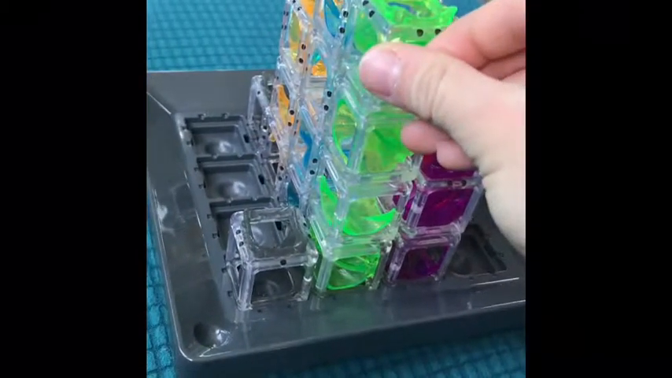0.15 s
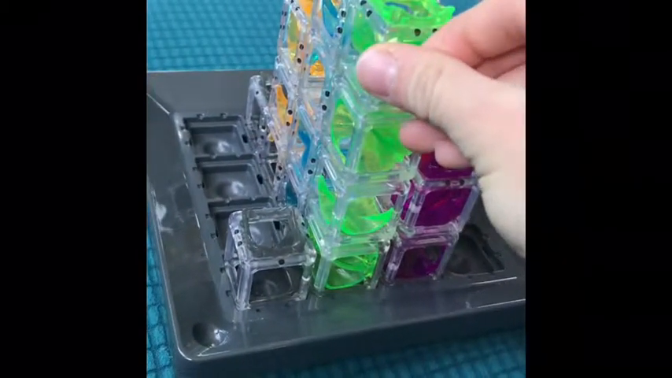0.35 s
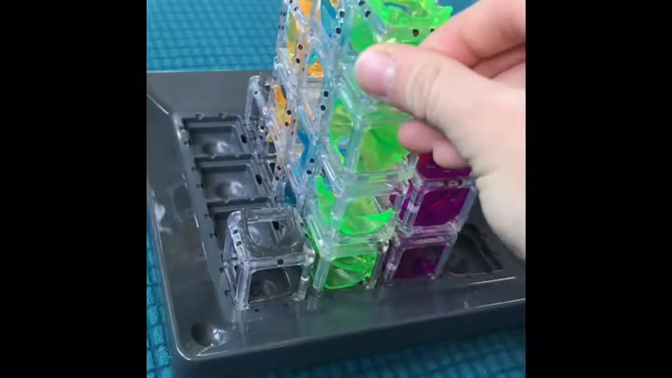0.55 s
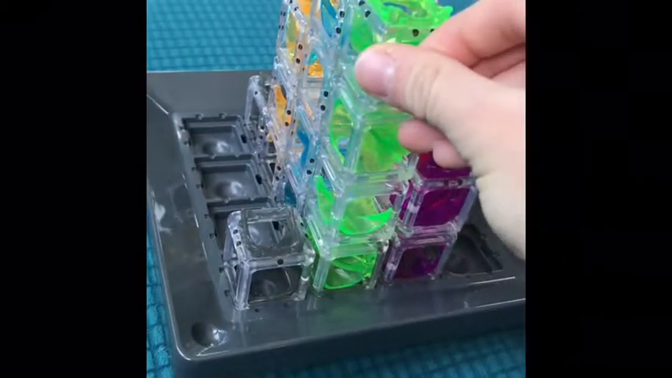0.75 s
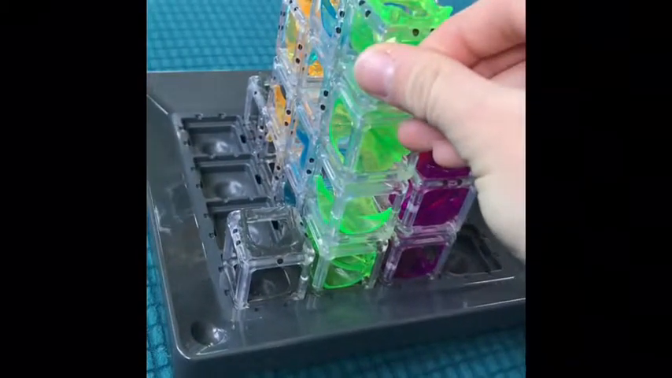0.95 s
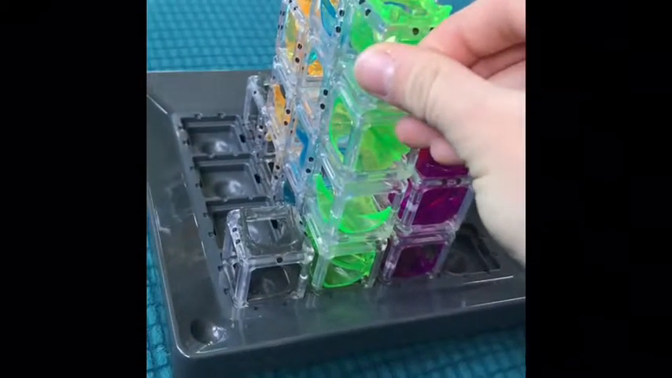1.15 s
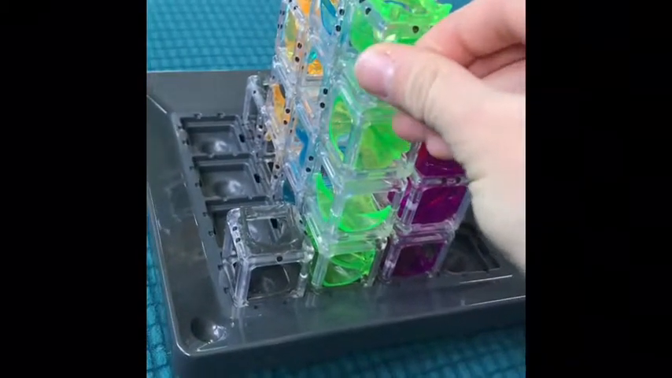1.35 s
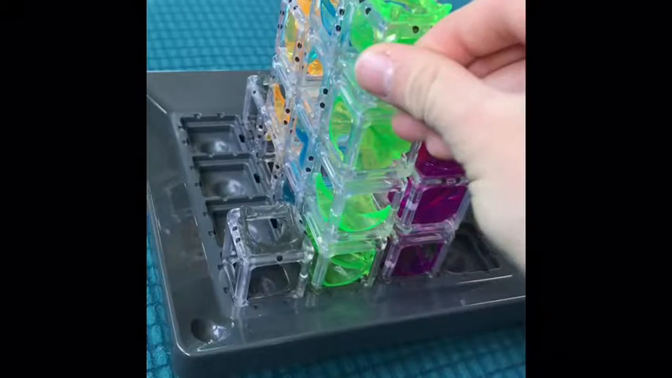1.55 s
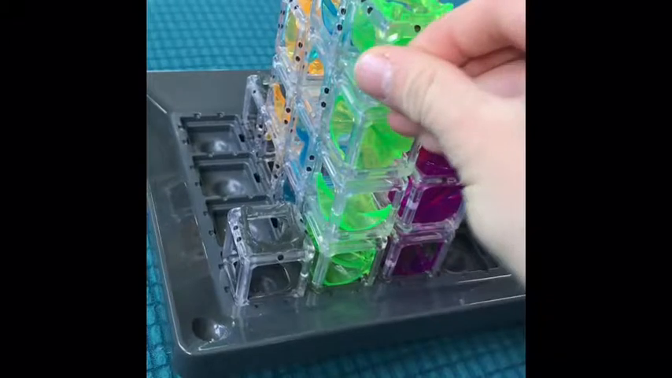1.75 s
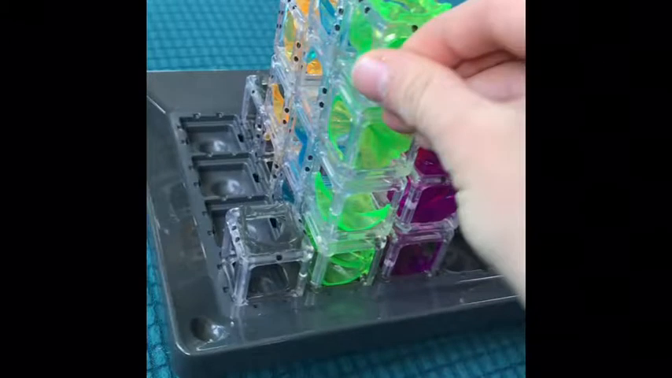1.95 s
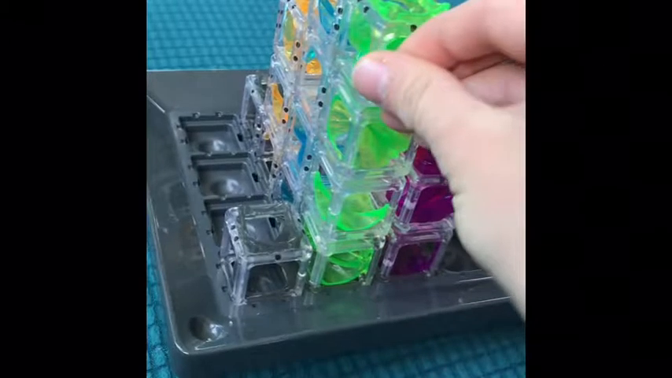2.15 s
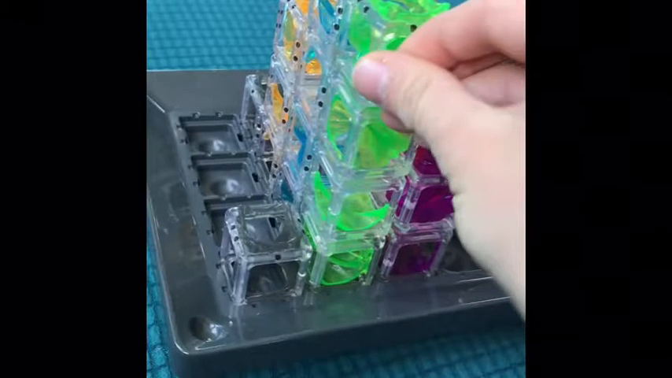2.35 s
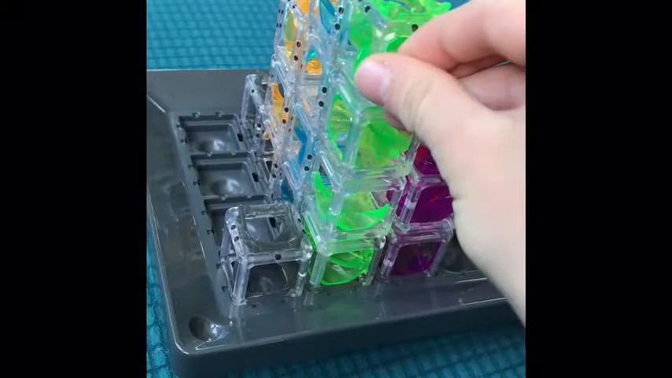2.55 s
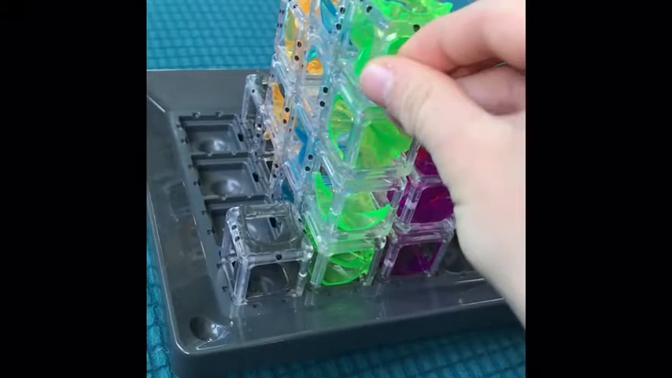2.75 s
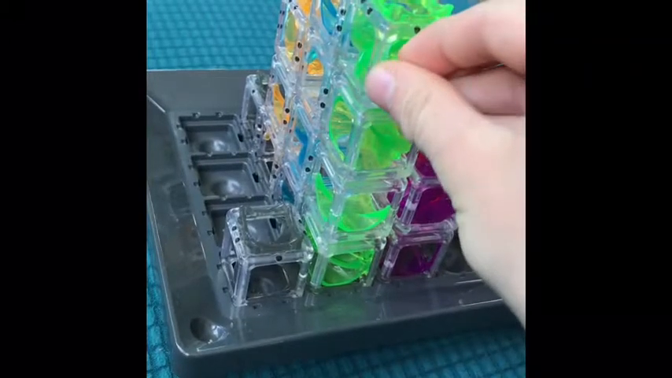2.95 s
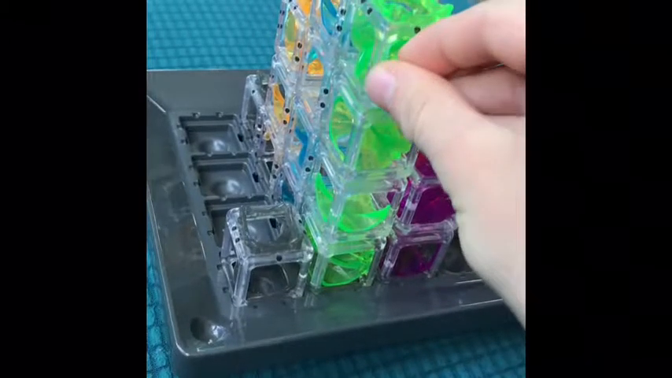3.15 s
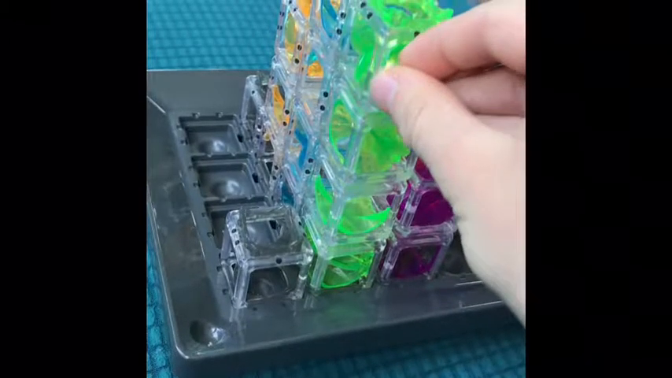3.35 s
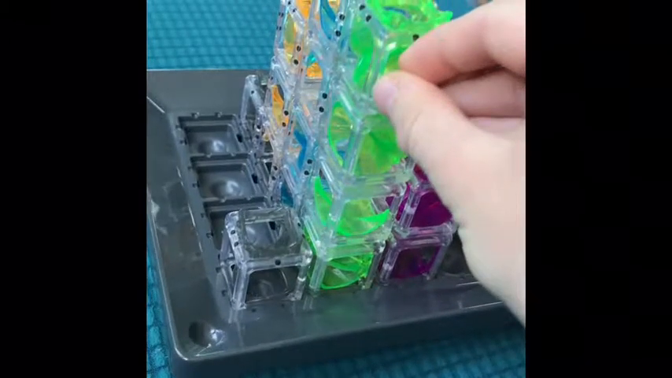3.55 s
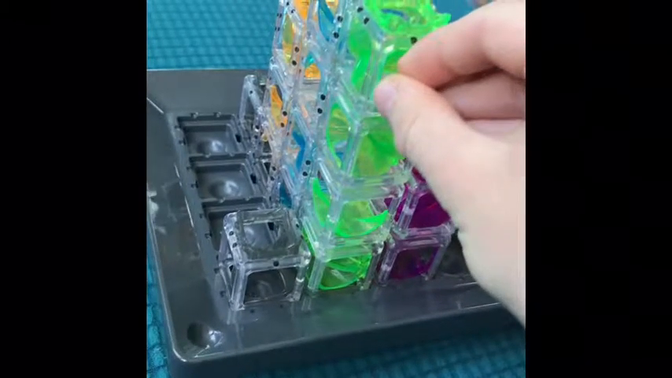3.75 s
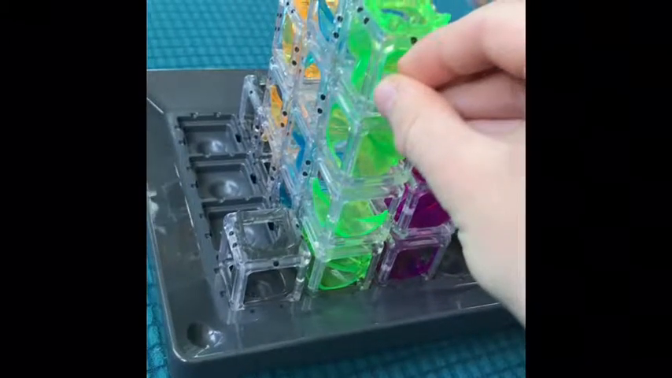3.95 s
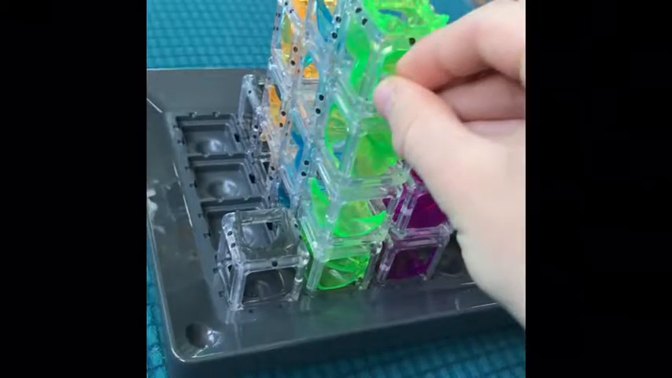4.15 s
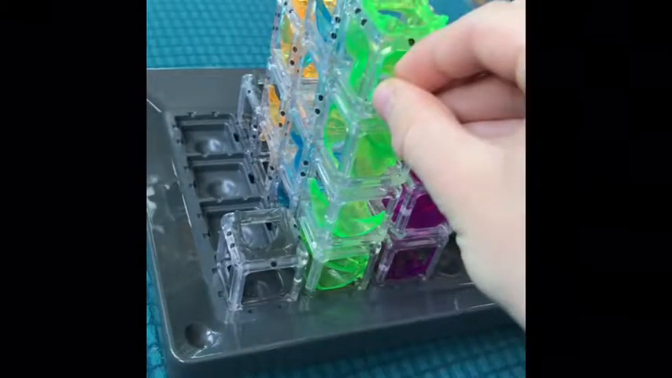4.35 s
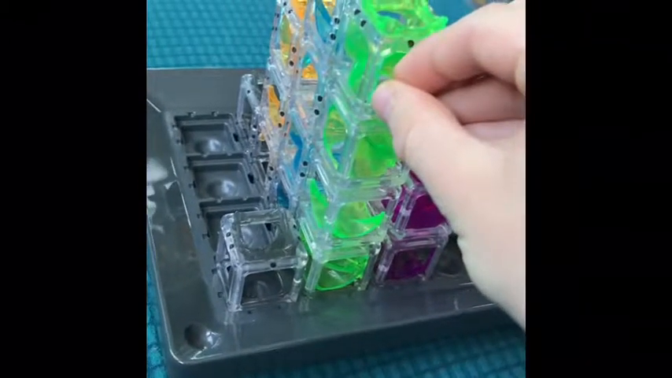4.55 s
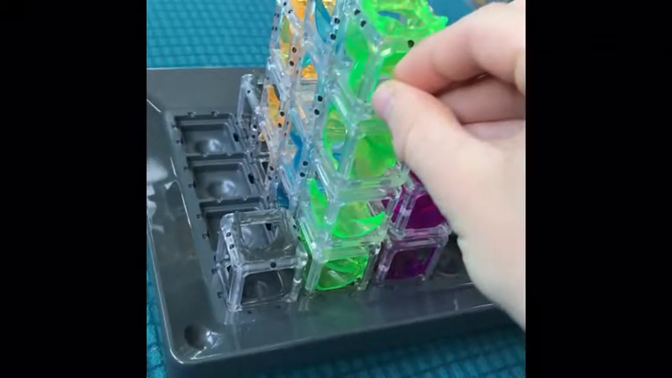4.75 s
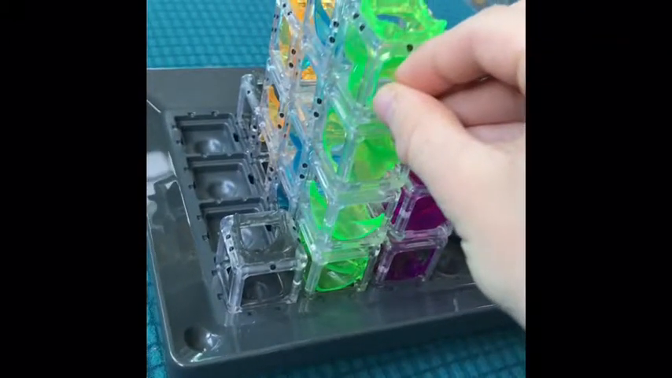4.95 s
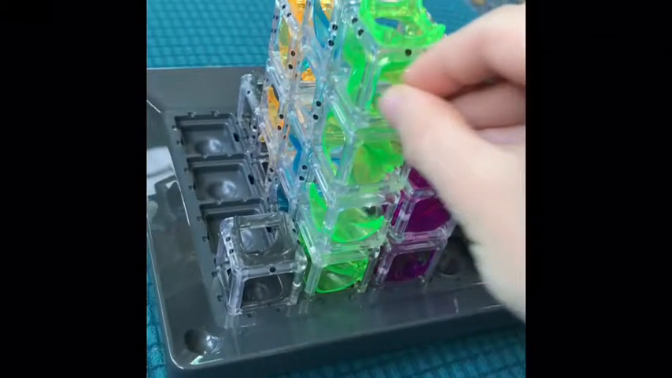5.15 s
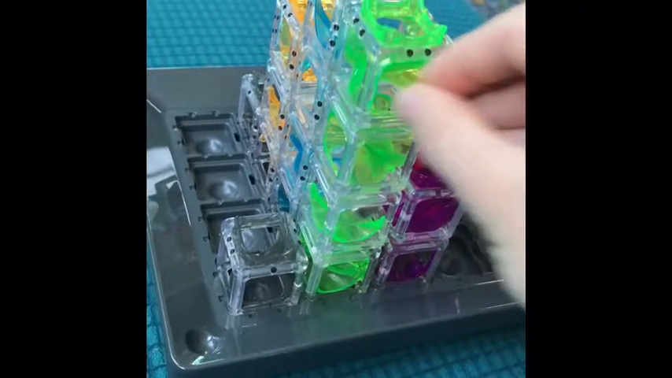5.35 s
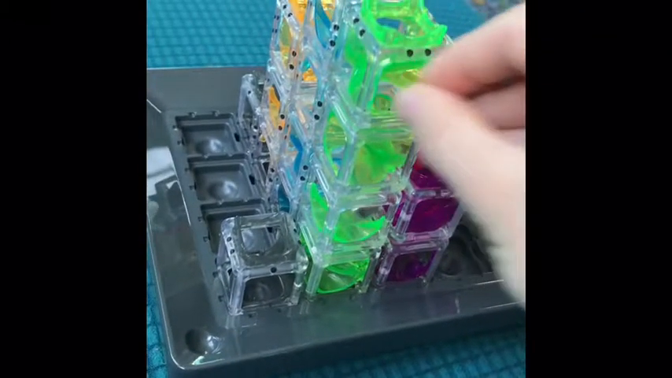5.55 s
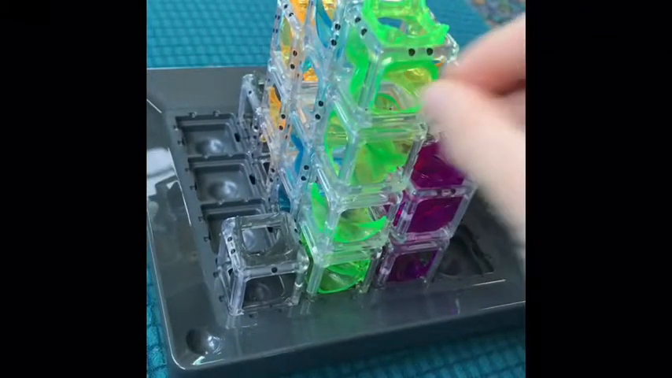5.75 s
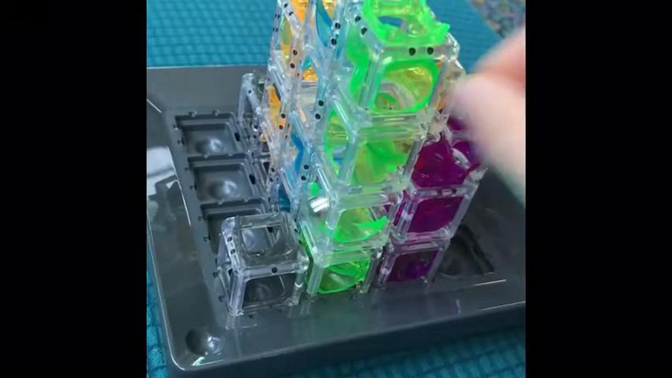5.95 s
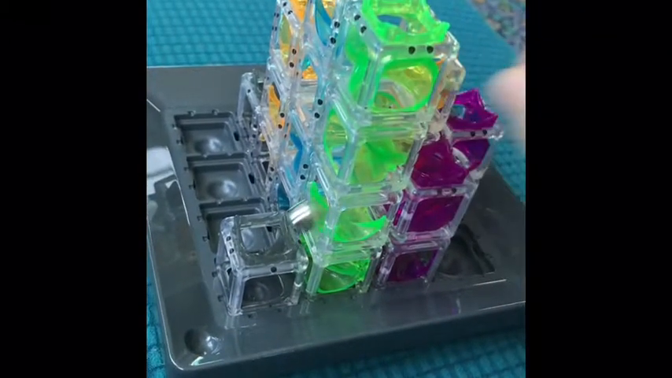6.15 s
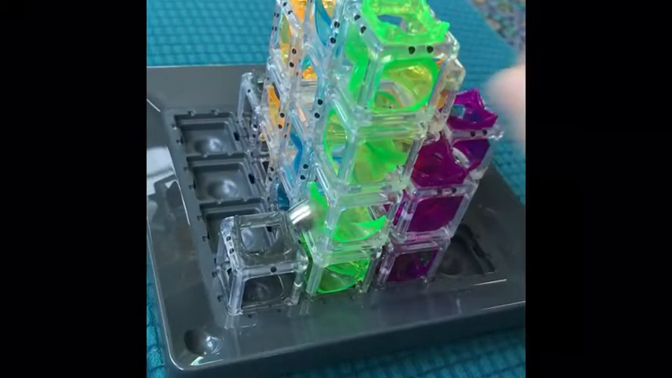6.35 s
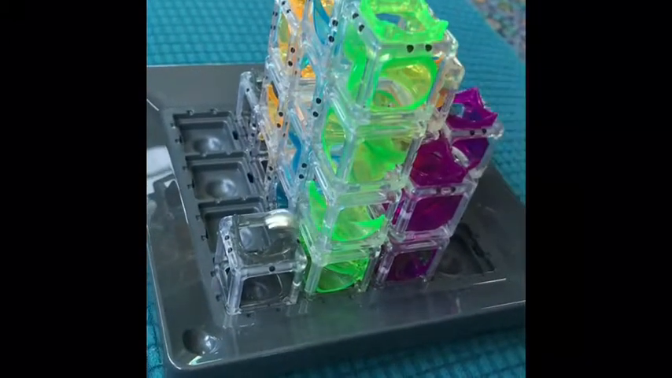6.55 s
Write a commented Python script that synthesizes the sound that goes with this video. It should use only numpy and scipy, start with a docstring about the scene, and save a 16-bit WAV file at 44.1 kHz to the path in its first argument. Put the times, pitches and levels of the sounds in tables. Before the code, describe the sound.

A quiet small room with a barely audible low hush. From about 1.5 seconds fingers rub faintly on thin plastic, with a tiny double click near 2.0 and more soft rubbing until a small, brighter click at 3.6, followed by a very faint brief graze of the marble. At 4.0 a steel marble starts down the hollow plastic tower: irregular, boxy clacks, some in close pairs, with dull tray thuds and rumbling, rattling rolls between. An especially heavy knock comes at 4.6, then more knocks from 4.9 to 5.4. Around 5.7 to 6.0 the impacts soften and the marble whirrs through a curved chute. Light taps follow from 6.0 to 6.45, slightly stronger at 6.2. At 6.6 it lands with the loudest, hardest clack, plus a small rebound. Close, muffled sound with a short room echo and a faint tick on the hardest blows.

```python
"""Marble in a plastic cube tower

Fingers rub and click the top cube of a clip-together plastic tower standing on a hollow tray.
A steel marble then drops from ramp to ramp, each drop adding a surge of rolling, and lands hard at the bottom.
Blows are sums of fading tones; rolling and rubbing are runs of tiny random bumps; the air is shaped noise.
A small room answers; only the low, dull part is heard, and the hardest blows get a faint, broad tick."""
import sys
import numpy as np
from scipy import signal
from scipy.fft import rfft, irfft, next_fast_len
from scipy.io import wavfile
from scipy.ndimage import map_coordinates

SR = 44100
rng = np.random.default_rng(int(sys.argv[2]) if len(sys.argv) > 2 else 0)


def inscribe(sig):
    """Save sig as 16-bit PCM at rate SR to the path in sys.argv[1].

    A 1-D sig is mono; a 2-D sig holds one channel per row.
    Samples are clipped to [-1, 1] before scaling.
    """
    pcm = np.round(np.clip(np.atleast_2d(sig).T, -1, 1) * 32767)
    wavfile.write(sys.argv[1], SR, pcm.astype(np.int16))


N = 295029

# In the tone tables only the balance between the rows counts: the finished sound is set to a level later.
# Room noise: (frequency [Hz], strength [dB per Hz])
AIR_TONE = [(8.8, -24.5), (15, 7.5), (28, -12.5), (49, -19), (81, -17.5), (102, -24), (131, -20.5),
            (292, -29.5), (318, -28), (484, -32), (623, -33.5), (2300, -38.5), (2990, -71.5), (5060, -120)]
AIR_DB = -59
# How long the room's echo lasts: (frequency [Hz], time to fade by 60 dB [s])
ROOM_DECAY = [(100, 0.76), (500, 0.3), (2200, 0.19)]

# Fingers shifting their grip on the top cube: (time [s], rub level [dB])
RUBS = [(1.55, -67.5), (1.8, -66.5), (2.15, -68), (2.74, -65.5), (3.26, -65), (3.6, -61)]
RUB_RISE_S, RUB_FALL_DB_PER_S = 0.11, 34
# Tone of skin on plastic: (frequency [Hz], strength [dB per Hz])
SKIN_TONE = [(100, -6), (250, -4), (500, 0), (900, -15.5), (2300, -16)]

# Rolling over the ramps: (frequency [Hz], strength [dB per Hz])
RAMP_TONE = [(30, -16), (60, 2), (140, -7), (250, 3), (450, -9.5), (700, -12), (1000, -22), (1650, -17.5),
             (2300, -28)]
# The steady roll, and the surge after a drop (added to that drop's weight in dB)
ROLL_DB, SURGE_DB, SURGE_RISE_S, BRAKE_DB_PER_S = -56, -18.5, 0.11, 55.5
# The freed marble grazing the top cube: (frequency [Hz], strength [dB per Hz])
GRAZE_TONE = [(1000, -25), (1700, -20.5), (1950, 5.5), (2200, 5.5), (2330, -7)]
GRAZE_S, GRAZE_DB, GRAZE_RISE_S, GRAZE_FALL_DB_PER_S = 3.635, -59, 0.063, 188
# The marble circling in a curved chute: (frequency [Hz], strength [dB per Hz])
CHUTE_TONE = [(150, -8.5), (330, -2.5), (480, 11.5), (680, 4), (900, -16), (1200, -14), (1450, -19.5),
              (1750, -19), (2300, -25)]
CHUTE_S, CHUTE_DB, CHUTE_RISE_S, CHUTE_FALL_DB_PER_S = 5.72, -37.5, 0.055, 85

# Both blow tables hold levels before the shared trims in blows(), and brightness before the shift in clack().
# Fingers clicking the top cube: (time [s], clack level [dB], brightness [dB per octave],
# tray thud level [dB], low note of the struck piece [Hz], its high note [Hz])
CLICKS = [(1.981, -52.5, -2, -51.5, 502, 1697), (2.0133, -50, -3.5, -45, 503, 1860),
          (3.5718, -45.5, 5.5, -47, 507, 1918)]
# The marble hitting a ramp or wall: (time [s], clack level [dB], brightness [dB per octave],
# tray thud level [dB], low note of the struck piece [Hz], its high note [Hz])
DROPS = [(4.0006, -26, -6.5, -26.5, 693, 1107), (4.0398, -31, -5, -28, 686, 1617),
         (4.246, -26, -4, -29, 722.5, 1118), (4.467, -24, -5, -26, 491, 1080),
         (4.5113, -45, -2.5, -35, 527, 2158), (4.598, -17.5, -5, -16.5, 461, 1644),
         (4.8916, -30, -4.5, -23, 678, 1222), (4.931, -42, -8, -37, 481, 1405),
         (5.1117, -26.5, -3.5, -31.5, 860, 1166), (5.2558, -25, -6.5, -26.5, 812, 1427),
         (5.3631, -30.5, -4.5, -34.5, 696, 1120), (5.382, -37.5, -4, -28.5, 423, 1127),
         (5.7246, -40, -2.5, -38, 529, 1092), (5.758, -44, -5.5, -39.5, 478, 1216),
         (5.852, -42, -16, -50, 442, 1707), (5.882, -45.5, -20, -52, 659, 1573),
         (6.009, -44.5, -8.5, -41, 461, 1530), (6.2108, -34.5, -6, -37.5, 452, 1900),
         (6.294, -41, -6.5, -32, 458, 1885), (6.354, -55.5, -7.5, -46.5, 384, 1418),
         (6.445, -48, -6, -36.5, 451, 1140), (6.6206, -16, -6.5, -19, 767, 2276),
         (6.664, -31.5, -16, -30, 527, 1100)]
# Tones of the hollow tray, before each blow varies them: (frequency [Hz], level [dB], 60 dB fade time [s])
TRAY = [(79, -14, 0.17), (112.4, -8.5, 0.22), (137.8, -3.5, .24), (169, -5, 0.27), (223, -0.5, .2),
        (245.9, 2.5, 0.18), (298.8, 0, 0.13), (351.6, -4, 0.21), (405.2, -7, 0.18), (477, -5, 0.11),
        (543.2, -7.5, 0.21)]
# Thin walls of the cubes: (frequency [Hz], strength [dB per Hz])
WALL_TONE = [(100, -17), (250, -2.5), (520, 3.5), (600, -1.5), (710, 3.5), (800, -1.5), (920, -4.5),
             (1110, -4), (1320, -5), (1670, -5.5), (2000, -6), (2300, -9)]
# How long the walls ring: (frequency [Hz], time to fade by 60 dB [s])
WALL_DECAY = [(200, 0.4), (550, 0.11), (1100, 0.089), (2200, 0.062)]

BAND_HZ = 2345  # top of the low band that is kept
TOP_HZ = 16000  # upper limit of the finished sound
FLATTEN_DB = -3  # peak level above which the sound is flattened


def amp(db):
    """Turn decibels into a gain."""
    return 10 ** (np.asarray(db) / 20)


def unit(x):
    """Scale a sound to an average (rms) level of 1."""
    return x / np.sqrt(np.mean(x ** 2) + 1e-20)


def along(points, hz):
    """Read a (frequency, value) table at any frequency, on a log frequency axis."""
    table_hz, values = np.transpose(points)
    return np.interp(np.log(hz + 1), np.log(table_hz), values)


def filtered(x, response):
    """Multiply each frequency of x by response(frequency)."""
    size = next_fast_len(len(x) + 8192)
    spectrum = rfft(x, size) * response(np.fft.rfftfreq(size, 1 / SR))
    return irfft(spectrum, size)[:len(x)]


def coloured(x, tone):
    """Shape x by a tone table, then set its rms to 1."""
    return unit(filtered(x, lambda hz: amp(along(tone, hz))))


def wobble(rate):
    """Draw a smooth curve through random points, rate of them a second."""
    points = rng.standard_normal(int(N * rate / SR) + 4)
    return map_coordinates(points, [np.arange(N) * rate / SR])


def swell(s, db, rise_s, fall_db_per_s):
    """A gain that rises from time s to its peak, then dies away."""
    t = np.arange(N) / SR - s
    rise = np.clip(t / rise_s, 0, 1)
    return rise * amp(db - fall_db_per_s * np.maximum(t - rise_s, 0))


def add(track, s, sound):
    """Mix a sound into the track at s seconds, cutting what runs past the end."""
    part = track[round(s * SR):][:len(sound)]
    part += sound[:len(part)]


def ringing(hz, db, t60, rise, span):
    """Fading tones in chance phases, swelling over rise s, at rms 1 over the first span s."""
    t = np.arange(int(SR * t60.max())) / SR
    phase = rng.uniform(0, 2 * np.pi, len(hz))
    fade = np.exp(-np.log(1000) * t / t60[:, None])  # down 60 dB after t60
    tones = fade * np.sin(2 * np.pi * hz[:, None] * t + phase[:, None])
    sound = np.zeros(SR // 2)  # at most half a second is kept
    add(sound, 0, amp(db) @ tones * (1 - np.exp(-t / rise)))
    return sound / np.sqrt(np.mean(sound[:int(span * SR)] ** 2))


def friction(gain, tone, bumps_per_s, uneven_db, t60=0.048):
    """Rubbing or rolling is a run of tiny bumps, each ringing the plastic briefly, under a gain curve."""
    bumps = (rng.random(N) < bumps_per_s / SR) * rng.standard_normal(N)
    t = np.arange(SR // 10) / SR
    plastic = rng.standard_normal(len(t)) * amp(-60 * t / t60)
    texture = coloured(signal.fftconvolve(bumps, plastic)[:N], tone)
    return gain * amp(uneven_db * wobble(25)) * texture


def air():
    """The faint steady noise of the room is random noise with a fixed tone."""
    return amp(AIR_DB) * coloured(rng.standard_normal(N), AIR_TONE)


def room(x, delay=0.0049):
    """Many blurred echoes, made from fading noise in which each frequency dies at its own speed."""
    hz, t, noise = signal.stft(rng.standard_normal(SR // 2), SR, nperseg=256)
    fade = amp(-60 * t / along(ROOM_DECAY, hz)[:, None])
    tail = signal.istft(noise * fade, SR, nperseg=256)[1]
    tail *= 1 - np.exp(-(np.arange(len(tail)) / SR / delay) ** 2)  # echoes build up over a few ms
    return signal.fftconvolve(x, tail / np.linalg.norm(tail))


def sway(t60=1.0, level_db=-26):
    """The whole toy rocks on its soft mat after each blow, as three very low tones."""
    track = np.zeros(N)
    for s, _, _, tray_db, *_ in CLICKS + DROPS:
        hz = rng.uniform(20, 45, size=3)
        rocking = ringing(hz, np.zeros_like(hz), np.full_like(hz, t60), rise=0.01, span=0.05)
        add(track, s, amp(tray_db + level_db) * rocking)
    return track


def fingers():
    """Skin shifting its grip rubs faintly on the plastic as a run of tiny bumps."""
    rubs = [swell(s, db, RUB_RISE_S, RUB_FALL_DB_PER_S) for s, db in RUBS]
    grip = np.linalg.norm(rubs, axis=0)
    return friction(grip, SKIN_TONE, bumps_per_s=860, uneven_db=0.7)


def roll_strength():
    """The marble keeps rolling from its first drop on; each drop adds a surge that friction brakes."""
    curves = [amp(ROLL_DB) * (np.arange(N) / SR > DROPS[0][0])]
    for s, wall_db, _, tray_db, *_ in DROPS:
        weight_db = (wall_db + tray_db) / 2
        curves.append(swell(s, weight_db + SURGE_DB, SURGE_RISE_S, BRAKE_DB_PER_S))
    return np.linalg.norm(curves, axis=0)


def rolling(rattle_db=-12):
    """The marble's bumps graze the top cube, rumble and rattle over ramps and whirr in the curved chute."""
    roll = roll_strength()
    graze_gain = swell(GRAZE_S, GRAZE_DB, GRAZE_RISE_S, GRAZE_FALL_DB_PER_S)
    graze = friction(graze_gain, GRAZE_TONE, bumps_per_s=600, uneven_db=1)
    rumble = friction(roll, RAMP_TONE, bumps_per_s=800, uneven_db=2.5)
    # Sparse seams between the cubes
    rattle = friction(roll, WALL_TONE, bumps_per_s=240, uneven_db=-0.5, t60=0.03)
    chute_gain = swell(CHUTE_S, CHUTE_DB, CHUTE_RISE_S, CHUTE_FALL_DB_PER_S)
    chute = friction(chute_gain, CHUTE_TONE, bumps_per_s=2100, uneven_db=-0.5)
    return graze + rumble + amp(rattle_db) * rattle + chute


def clack(bright_db, scatter_db=2.5, count=64):
    """The thin cube walls ring in many crowded, short tones, weighted anew at every spot struck."""
    hz = 100 + (BAND_HZ - 100) * (np.arange(count) + rng.random(count)) / count
    # A harder contact is brighter; the tilt works only above 700 Hz
    tilt_db = (bright_db + 4.5) * np.log2(np.maximum(hz, 700) / 1000)
    db = along(WALL_TONE, hz) + tilt_db + scatter_db * rng.standard_normal(count)
    return ringing(hz, db, along(WALL_DECAY, hz), rise=0.00083, span=0.022)


def chatter(bright_db, gap=0.004, second_db=-3, third_db=-7):
    """After the first knock the loosely clipped walls knock twice more within milliseconds."""
    sound = clack(bright_db)
    second, third = np.cumsum(gap * rng.uniform(0.6995, 1.5, size=2))
    add(sound, second, amp(second_db) * clack(bright_db))
    add(sound, third, amp(third_db) * clack(bright_db))
    return sound


def thud(scatter_db=2.15, detune=0.035):
    """The blow runs down the tower and the hollow tray's boom swells up a little more slowly."""
    hz, db, t60 = np.transpose(TRAY)
    shift, strength = rng.standard_normal((2, len(hz)))
    return ringing(hz * (1 + detune * shift), db + scatter_db * strength, t60, rise=0.013, span=0.034)


def piece(hz, db, t60):
    """The one ramp or frame that is hit rings at its own note."""
    note = ringing(np.array([hz]), np.zeros(1), np.array([t60]), rise=0.0014, span=0.026)
    return amp(db) * note


def blows(rows, clack_db=0.5, thud_db=-3.0, low_db=-4, high_db=-2.0, low_t60=0.11, high_t60=0.038,
          room_db=-13):
    """Each contact clacks the walls, thumps the tray, rings one piece and wakes the room."""
    track = np.zeros(N)
    for s, wall_db, bright_db, tray_db, low_hz, high_hz in rows:
        weight_db = (wall_db + tray_db) / 2
        hit = amp(wall_db + clack_db) * chatter(bright_db)
        hit += piece(low_hz, weight_db + low_db, low_t60)
        # A harder contact rings the high note more
        hit += piece(high_hz, wall_db + bright_db + high_db, high_t60)
        hit += amp(tray_db + thud_db) * thud()
        add(track, s, hit)
        add(track, s, amp(room_db) * room(hit))
    return track


def scene():
    """All the sounds add up at one microphone."""
    background = air() + sway()
    handling = fingers() + blows(CLICKS)
    marble = rolling() + blows(DROPS)
    return (background + handling + marble)[None]


def record(dry, hardness=14):
    """Only a low band is kept; flattened peaks then give the hardest blows a faint, broad tick."""
    # The cut-off slopes over 120 Hz
    dull = filtered(dry[0], lambda hz: np.clip((BAND_HZ - hz) / 120 + 0.5, 0, 1))
    excess = np.abs(dull / amp(FLATTEN_DB)) ** hardness
    flattened = dull / (1 + excess) ** (1 / hardness)
    return filtered(flattened, lambda hz: hz < TOP_HZ)[None]


dry = scene()
out = record(dry)
inscribe(out)
```